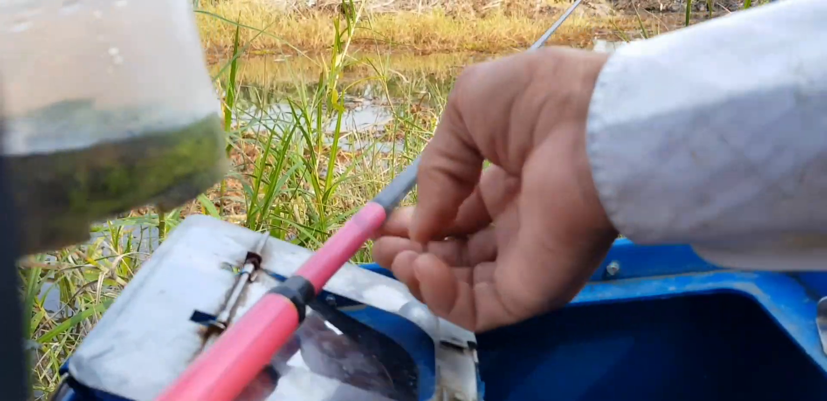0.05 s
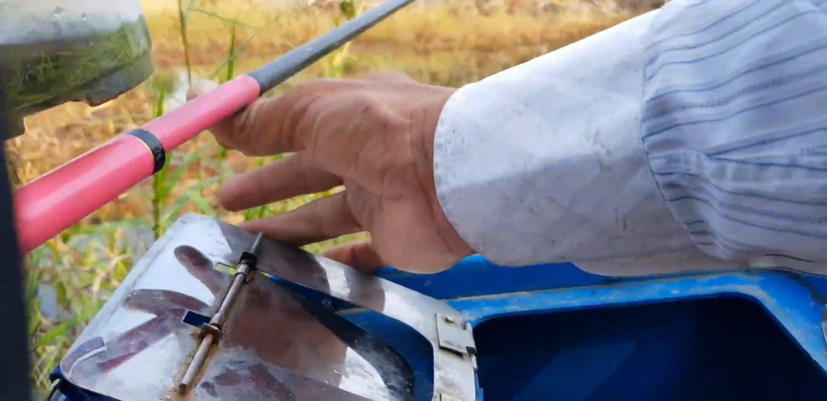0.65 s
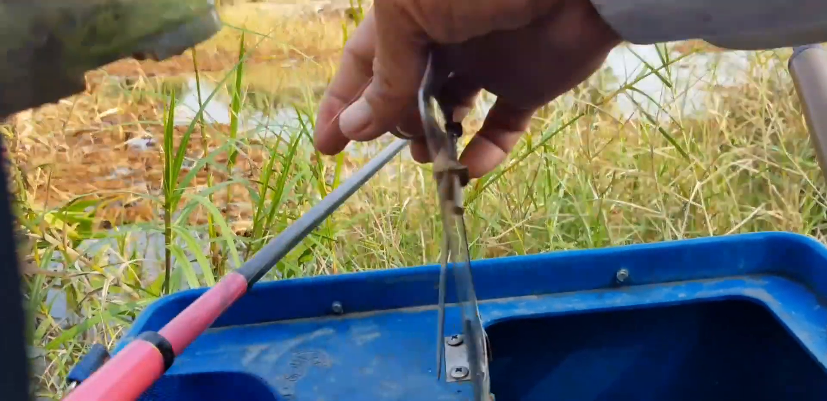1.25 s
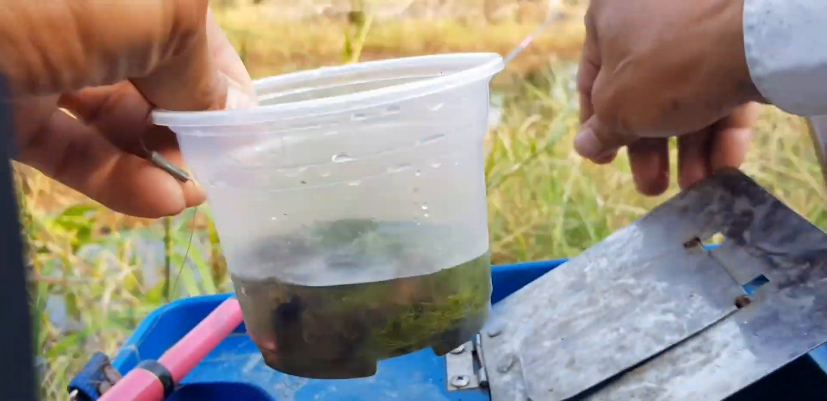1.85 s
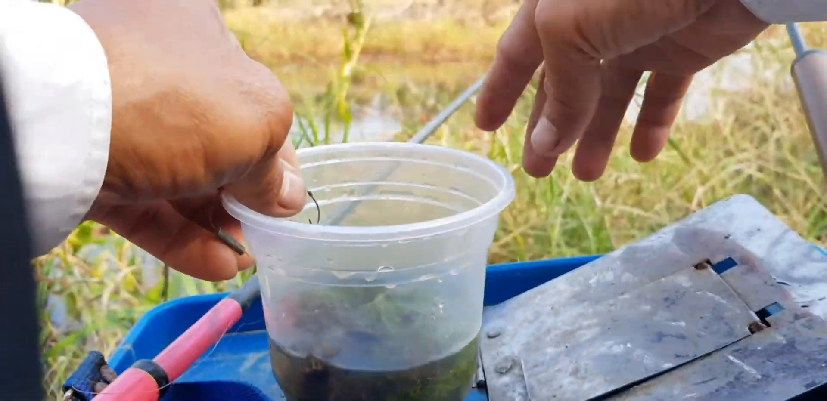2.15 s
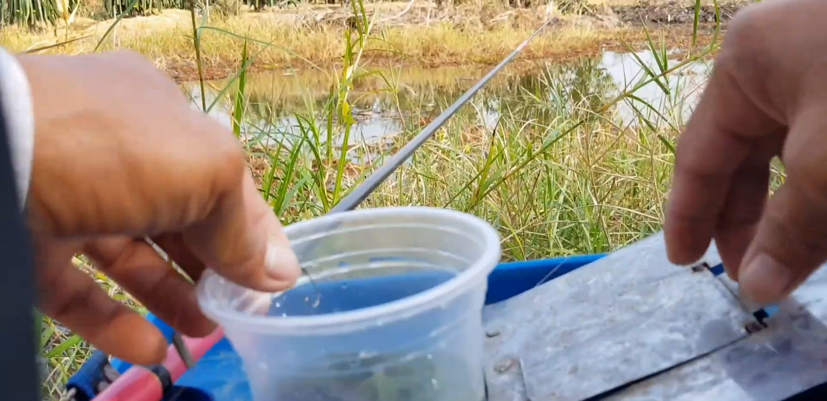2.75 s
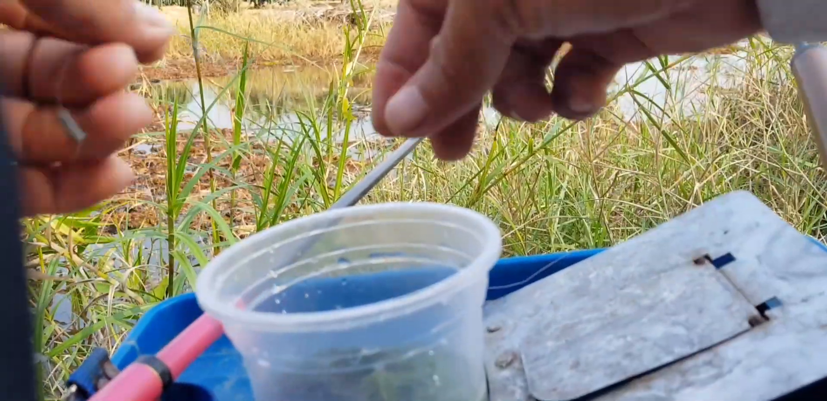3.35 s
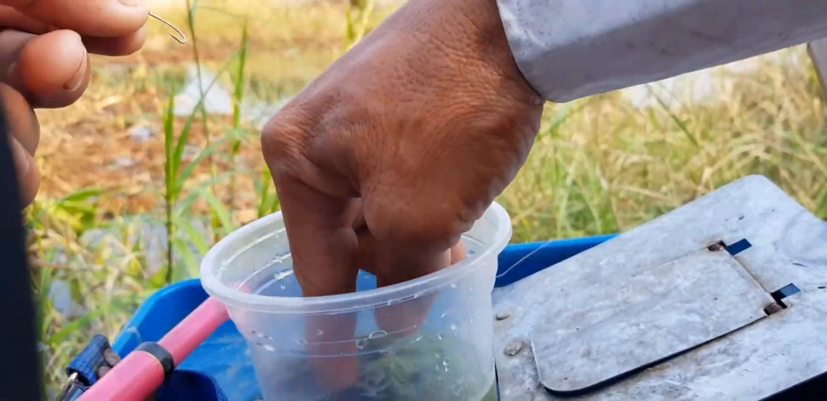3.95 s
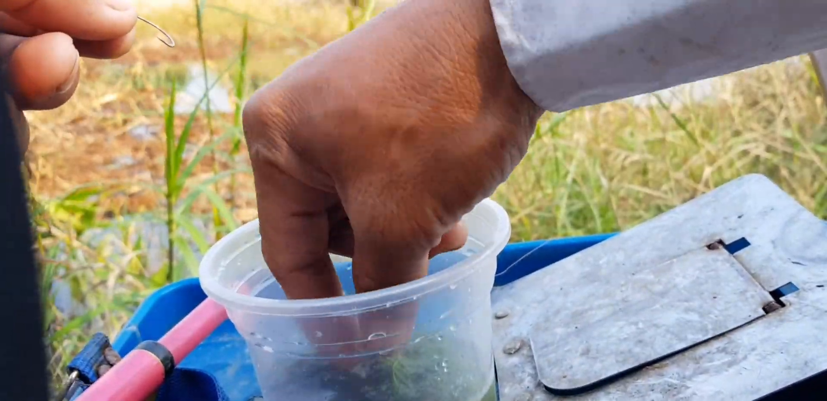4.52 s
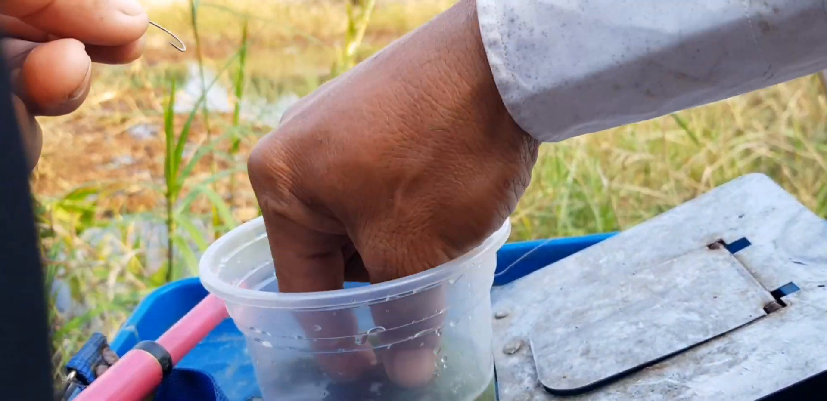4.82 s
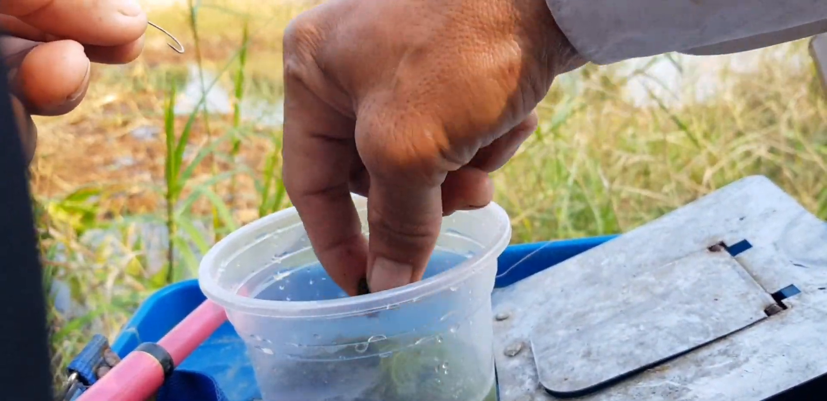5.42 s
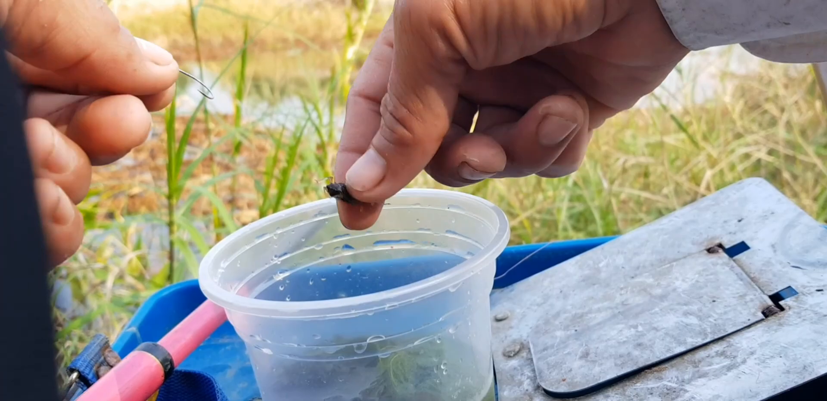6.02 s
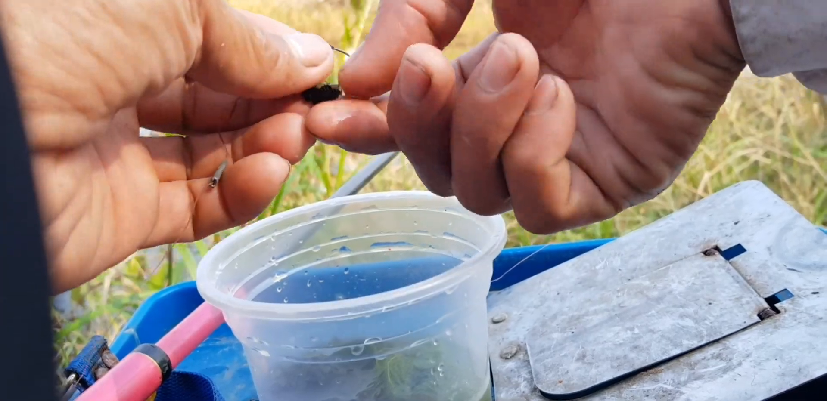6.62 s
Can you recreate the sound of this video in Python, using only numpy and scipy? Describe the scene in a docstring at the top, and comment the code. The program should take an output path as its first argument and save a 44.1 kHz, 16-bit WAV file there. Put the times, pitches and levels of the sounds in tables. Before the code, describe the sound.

A low distant rumble and faint hiss run throughout, outdoors. From the start, close and slightly right, things scrape and knock on a hollow plastic tackle box, with a sharp tick at 0.6 seconds. At about 1.2 seconds a metal lid slams, the loudest event, bouncing and rattling on its hinge until 1.5 while the rumble sinks. More scrapes and hollow knocks follow around 2 seconds, and a plastic cup of water thuds down at 2.3. A sleeve brushes softly, and the cup's thin wall gives a quick cluster of dry clicks, sharpest just after 3 seconds. Around 4 seconds fingers dip in with tiny faint splashes, and the cup bumps the box softly until 5. The rumble swells back by about 4.3. Small birds chirp faintly on the left near 2.2 and 3.5, then again from 5.6 to 6.4 seconds.

```python
"""On a reedy bank, over a distant rumble and hiss, an angler rummages at a plastic tackle box: it scrapes,
knocks and ticks. The rumble sinks as the metal lid swings over, slams and bounces on its rattling hinge.
A few small birds start to whistle. A cup of water thuds down on the hollow box, and its thin wall clicks
as it is let go. A sleeve brushes past, and fingers dip in for bait with tiny splashes while the cup
bumps the box. The rumble swells back and the birds call again."""
import sys
import numpy as np
from scipy import signal
from scipy.fft import rfft, irfft, next_fast_len
from scipy.io import wavfile

SR = 44100
rng = np.random.default_rng(int(sys.argv[2]) if len(sys.argv) > 2 else 0)


def generate_wav(sig):
    """Save sig (samples, or channels by samples) to the path in sys.argv[1] as 16-bit PCM at SR."""
    pcm = np.round(np.clip(np.atleast_2d(sig).T, -1, 1) * 32767).astype(np.int16)
    wavfile.write(sys.argv[1], SR, pcm)


N = 294411
TIME = np.arange(N) / SR
RING_TIME = np.arange(SR // 3) / SR   # seconds after a hit


def from_db(db):
    return 10 ** (np.asarray(db) / 20)

def unit_level(x):
    """Scale a sound to an average (rms) level of 1."""
    return x / np.sqrt(np.mean(x ** 2) + 1e-20)

def unit_onset(x):
    """Scale a hit so that its first 20 ms have an average level of 1."""
    return x / np.sqrt(np.mean(x[..., :SR // 50] ** 2) + 1e-20)

def at_hz(curve, hz):
    """Read a curve's value at any pitch."""
    pitches, values = np.transpose(curve)
    return np.interp(np.log(hz + 1e-3), np.log(pitches), values)

def panned(db):
    """Two gains that make the left side db louder than the right."""
    return from_db(np.array([[.5], [-.5]]) * db)

def add(out, start_s, sound):
    """Mix a sound in at its start time."""
    i = max(round(start_s * SR), 0)
    out[:, i:i + sound.shape[-1]] += sound[..., :N - i]

def gate(start_s, length_s, rise_s=.01, fall_s=.075):
    """Fade in, hold, and fade out by the end of the length."""
    return np.clip(np.minimum((TIME - start_s) / rise_s, (start_s + length_s - TIME) / fall_s), 0, 1)

def swells(peaks, rise_db_per_s, fall_db_per_s):
    """A level that grows to each peak and dies away."""
    return sum(from_db(db - np.maximum(rise_db_per_s * (s - TIME), fall_db_per_s * (TIME - s)))
               for s, db in peaks)

def dying(ring_s):
    """A fade that loses 60 dB in ring_s seconds."""
    return from_db(-60 * RING_TIME / ring_s)

def drift(per_s):
    """A random wobble that takes per_s turns a second."""
    turns = rng.standard_normal(int(N / SR * per_s) + 2)
    return unit_level(np.interp(TIME * per_s, np.arange(len(turns)), turns))

def grains(per_s, spread_db):
    """Tiny kicks of uneven size at random times."""
    sizes = from_db(spread_db * np.minimum(rng.exponential(1, N), 4)) * rng.choice([-1, 1], N)
    return sizes * (rng.random(N) < per_s / SR)

def through(kicks, ring):
    """Every kick sets off the same ring."""
    return unit_level(signal.fftconvolve(kicks[None], ring, axes=1)[:, :N])

def noise(spectrum, likeness, size, pan=((1, 0), (2, 0)), left_lead_s=0):
    """Shaped stereo noise; likeness is 1 where both ears hear the same, 0 where they are unrelated."""
    hz = np.arange(size // 2 + 1) * SR / size
    mid, side = rfft(rng.standard_normal((2, size)))
    alike = np.clip(at_hz(likeness, hz), -1, 1)
    both = np.sqrt(1 + alike) * mid + np.sqrt(1 - alike) * side * [[1], [-1]]
    both[1] *= np.exp(-2j * np.pi * hz * left_lead_s)
    return unit_level(irfft(both * from_db(at_hz(spectrum, hz)) * panned(at_hz(pan, hz)), size))

def steady(spectrum, likeness, **placing):
    """Noise that lasts the whole scene."""
    return noise(spectrum, likeness, next_fast_len(N, True), **placing)[:, :N]

# tone of the far rumble and the far hiss: pitch_hz, level_db
RUMBLE_TONE = [(13, -41), (22, -24.5), (43, -4), (92, 0), (112, -3), (135, -2.5), (174, -11.5),
               (229, -13.5), (299, -12), (389, -21.5), (441, -24.5), (491, -29.5), (771, -44), (900, -46.5),
               (1170, -74), (1980, -120)]
HISS_TONE = [(300, -19.5), (550, 5.5), (780, -10.5), (980, 0.5), (1150, -5.5), (1600, 2.5), (2300, -6),
             (2900, -10.5), (3400, -8), (4300, -15.5), (6700, -20.5), (7900, -38.5), (12500, -19.5),
             (16000, -31.5)]
# how alike each is in the two ears: pitch_hz, likeness
RUMBLE_LIKENESS = [(30, 0.9), (130, 0.99), (300, 0.95), (640, 0.96), (1000, .1)]
HISS_LIKENESS = [(700, 0.06), (1600, .55), (3500, 0.73), (9000, .1)]
# how far left the hiss sits: pitch_hz, left_over_right_db
HISS_PAN = [(600, 4.5), (1700, 5.5), (3400, 12.5), (6500, 8), (12000, 2)]
# loudness of the hiss: time_s, level_db
HISS_LEVELS = [(2.0, -63.5), (3.1, -67), (3.5, -71), (4.0, -64), (4.55, -65), (5.15, -61.5), (6.68, -60.5)]
def outdoors():
    """A lumpy far rumble with one long lull, under a smooth hiss from the left."""
    lull_db = -9 * gate(start_s=.91, length_s=3.37, rise_s=.7, fall_s=.89)
    rumble = from_db(-41 + lull_db + 1.2 * drift(20)) * steady(RUMBLE_TONE, RUMBLE_LIKENESS)
    rumble = signal.sosfilt(signal.butter(3, 33, "high", fs=SR, output="sos"), rumble)
    hiss_db = np.interp(TIME, *np.transpose(HISS_LEVELS))
    hiss = steady(HISS_TONE, HISS_LIKENESS, pan=HISS_PAN, left_lead_s=.00043)
    return rumble + from_db(hiss_db) * hiss

# where nearby sounds sit: pitch_hz, left_over_right_db
NEAR_PAN = [(170, -2), (300, 0.5), (450, -0.5), (700, -9), (1200, -2), (2200, -8), (3000, 4.5), (4700, -1),
            (8000, 4), (15000, 3)]
def struck(notes, damping=1, swell_cycles=.56):
    """A struck thing rings at its own notes, low ones building up last; more damping cuts them short."""
    out = 0
    for k, (hz, db, ring_s) in enumerate(notes):
        strength = (-1) ** k * from_db(db + 2 * rng.standard_normal())   # no two hits are the same
        swell = 1 - np.exp(-(RING_TIME * hz / swell_cycles) ** 2)
        note = swell * dying(ring_s / damping) * np.sin(2 * np.pi * hz * RING_TIME)
        out = out + strength * panned(at_hz(NEAR_PAN, hz)) * note
    return unit_onset(out)

# how alike nearby sounds are in the two ears: pitch_hz, likeness
NEAR_LIKENESS = [(300, 0.68), (700, 0.37), (1300, 0.88), (2300, 0.1), (16000, 0.066)]
def burst(spectrum, ring_s, tail_db, tail_s):
    """Countless close notes blur into noise that dies fast and leaves a weak, longer tail."""
    fade = dying(ring_s) + from_db(tail_db) * dying(tail_s)
    return unit_onset(noise(spectrum, NEAR_LIKENESS, len(RING_TIME), NEAR_PAN) * fade)

def favouring(notes, near_hz, boost_db):
    """The spot that is struck brings out the notes near one pitch."""
    return [(hz, db + boost_db * np.exp(-(np.log2(hz / near_hz) / .33) ** 2), ring_s)
            for hz, db, ring_s in notes]

# the notes of the plastic box: pitch_hz, level_db, ring_s
BOX_NOTES = [(102, -14, 0.22), (149.2, -17, 0.28), (167, -9.5, 0.18), (227, -9.5, 0.18), (259, -10.5, 0.18),
             (282.5, -0.5, 0.086), (305, 1, 0.041), (357.5, -13, 0.13), (413, -19, .08)]
def box_thump(damping, near_hz, boost_db):
    """The hollow box takes a few vibrations to get moving."""
    return struck(favouring(BOX_NOTES, near_hz, boost_db), damping, swell_cycles=.82)

# the clear notes of the metal lid: pitch_hz, level_db, ring_s
LID_NOTES = [(600, -14.5, 0.1), (660, -18, 0.21), (893, -13, 0.053), (1072.6, -1.5, 0.09),
             (1196, 0.5, 0.071), (1469, 1.5, .08), (1578, -4.5, 0.11), (1845, -5, 0.054), (1925, -3, .08),
             (2193, -2.5, 0.052), (2330, -7.5, .07), (2526, -10.5, 0.11), (2920, -15, 0.064),
             (3037, -15, 0.085), (3109, -15.5, 0.055), (4750, -18.5, .06), (4863, -19, 0.12)]
# tone of the lid's many blurred notes: pitch_hz, level_db
CLANG_TONE = [(300, -19), (450, -1), (800, -4.5), (1150, 1), (1340, -3.5), (1750, -2.5), (2200, -5),
              (2800, -11.5), (3500, -20.5), (5000, -39.5)]
def lid_clang(damping, near_hz):
    """The lid's clear notes ring over a short burst of blurred ones."""
    clear = struck(favouring(LID_NOTES, near_hz, boost_db=2.5), damping)
    return unit_onset(clear + burst(CLANG_TONE, ring_s=.036, tail_db=-24, tail_s=.2))

# tone of hard surfaces meeting: pitch_hz, level_db
CRACK_TONE = [(1500, -18.5), (3200, -2), (4800, 2.5), (6900, -2), (7700, -11.5), (8600, -14.5), (10300, 0),
              (13000, -1), (16000, -13.5)]
def contact(clang_db, thump_db, crack_db, clang_hz, thump_hz, damping):
    """Each hit cracks, thumps the box and rings the lid."""
    crack = from_db(crack_db) * burst(CRACK_TONE, ring_s=.029, tail_db=-24.5, tail_s=.36)
    thump = from_db(thump_db) * box_thump(damping, thump_hz, boost_db=7)
    clang = from_db(clang_db) * lid_clang(damping, clang_hz)
    return (crack + thump + clang) * (1 - dying(.0059))   # the surface gives a little before it bites

def sliding(clang_gain, hiss_gain):
    """Tiny slips ring the hand-muffled lid over a gritty hiss; its free edge sings faintly."""
    catching = from_db(2 * drift(35) + 2 * drift(400))
    slips = grains(per_s=1800, spread_db=6) * catching
    muffled = through(slips, struck(LID_NOTES, damping=14))
    edge = through(slips, struck(favouring(LID_NOTES, near_hz=3100, boost_db=14), damping=1.1))
    grit = unit_level(catching * steady(CLANG_TONE, NEAR_LIKENESS, pan=NEAR_PAN))
    hiss = unit_level(catching * steady(CRACK_TONE, NEAR_LIKENESS, pan=NEAR_PAN))
    clang = unit_level(muffled + from_db(6.5) * grit)
    return clang_gain * clang + hiss_gain * (hiss + from_db(-4.5) * edge)

# rod, lid and cup slide over the box: start_s, length_s, clang_db, hiss_db, drum_db
SCRAPES = [(0.0, 1.25, -56, -62, -71), (0.35, 0.033, -64, -83, -51), (0.019, 0.12, -45, -59, -38),
           (0.123, 0.17, -51, -61, -45), (0.657, 0.08, -54, -59.5, -60), (1.015, 0.15, -54, -57, -53),
           (1.33, 0.24, -43, -76, -38.5), (1.571, 0.12, -44.5, -58, -39), (1.686, 0.27, -53.5, -72, -45.5),
           (1.966, 0.14, -42, -53, -44.5), (2.266, 0.1, -44.5, -65.5, -38),
           (2.375, 0.28, -59.5, -71, -44.5), (2.659, 0.13, -60.5, -83, -47)]
def scrapes():
    """Each scrape bites quickly, eases off and stops; its slips ring the lid and drum on the box."""
    clang_gain, hiss_gain = 0, 0
    drum_gain = from_db(-60) * gate(0, length_s=3.25)   # hands drum faintly until the cup is let go
    for start_s, length_s, clang_db, hiss_db, drum_db in SCRAPES:
        easing_db = -2.5 * np.clip((TIME - start_s) / length_s, 0, 1)
        stroke = gate(start_s, length_s) * from_db(easing_db)
        clang_gain = clang_gain + from_db(clang_db) * stroke
        hiss_gain = hiss_gain + from_db(hiss_db) * stroke
        drum_gain = np.maximum(drum_gain, from_db(drum_db) * stroke)
    drumming = through(grains(per_s=3200, spread_db=4.5), struck(BOX_NOTES, damping=1.3))
    hand_pressure = from_db(drift(22))
    return drum_gain * drumming + hand_pressure * sliding(clang_gain, hiss_gain)

# hand, rod and cup knock against the box: start_s, clang_db, thump_db, crack_db, thump_hz
KNOCKS = [(0.036, -41, -41.5, -63, 244), (0.061, -40.5, -43, -45, 257), (0.081, -34, -34.5, -42.5, 320),
          (0.131, -43, -35, -61, 250), (0.188, -48, -34, -56, 159), (0.256, -46, -53, -55, 166),
          (0.463, -47, -43, -69, 159), (0.545, -49, -62, -63, 132), (0.786, -43, -51.5, -59.5, 169),
          (0.943, -41.5, -43.5, -50.5, 159), (1.971, -32, -26.5, -43, 328), (2.041, -46, -33.5, -63, 237),
          (2.086, -45, -33, -54, 240), (2.268, -43, -30.5, -62, 186), (2.281, -44.5, -34, -55, 323),
          (2.319, -43.5, -41, -51, 148), (2.396, -53.5, -41, -68, 155), (2.482, -53, -51, -65, 283),
          (2.523, -51, -42.5, -70, 214), (2.593, -58, -59, -80, 150), (2.797, -52, -55, -66, 315),
          (3.096, -50.5, -36, -75, 241)]
def knocks():
    """Light knocks land on different spots of the box."""
    out = np.zeros((2, N))
    for start_s, clang_db, thump_db, crack_db, thump_hz in KNOCKS:
        knock = contact(clang_db, thump_db, crack_db, clang_hz=1111, thump_hz=thump_hz, damping=1)
        add(out, start_s, knock)
    return out

# sharp ticks of small tackle: start_s, peak_db
TICKS = [(0.568, -21), (2.719, -50), (4.778, -33.5)]
def tackle_ticks():
    """Hard little snaps, over in a millisecond or two."""
    out = np.zeros((2, N))
    for start_s, peak_db in TICKS:
        snap = burst([(800, -20), (2500, -3), (6500, 0), (16000, -5)], ring_s=.002, tail_db=-38, tail_s=.12)
        add(out, start_s, from_db(peak_db) * snap / np.abs(snap).max())
    return out

# the loose hinge rattles: start_s, clang_db, crack_db
HINGE_RATTLES = [(1.124, -35.5, -35.5), (1.245, -28, -41), (1.274, -32.5, -39), (1.305, -33.5, -41.5),
                 (1.342, -31, -37), (1.364, -31.5, -37)]
# the lid lands and bounces: start_s, clang_db, crack_db, clang_hz
LID_BLOWS = [(1.154, -11.5, -29, 1190), (1.160, -20, -31, 1080), (1.172, -22, -41, 1100),
             (1.193, -27.5, -44, 1580), (1.207, -15.5, -26, 1010), (1.314, -13, -34, 1490),
             (1.395, -25, -45, 1170), (1.44, -29, -56, 1420), (1.499, -28.5, -48.5, 1290),
             (1.543, -30.5, -50.5, 1550)]
def lid_slam():
    """The lid slams and bounces on its rattling hinge; harder blows shake the box more."""
    out = np.zeros((2, N))
    for start_s, db, crack_db in HINGE_RATTLES:
        add(out, start_s, contact(db, db - 11.5, crack_db, clang_hz=1533, thump_hz=184, damping=.93))
    for start_s, db, crack_db, clang_hz in LID_BLOWS:
        add(out, start_s, contact(db, db - 3, crack_db, clang_hz, thump_hz=289, damping=.92))
    return out

# small birds chirp: start_s, length_s, from_hz, toward_hz, level_db
CHIRPS = [(2.239, 0.035, 4800, 2800, -62.5), (3.315, 0.048, 3920, 2760, -68),
          (3.467, 0.033, 3854, 2950, -65), (3.588, .03, 3700, 2920, -68), (5.128, 0.096, 9500, 8200, -79),
          (5.619, 0.093, 7380, 2065, -56), (6.185, 0.05, 3040, 3600, -55.5),
          (6.273, 0.15, 2300, 1303, -61.5)]
def birds():
    """Thin whistles off to the left glide fast, then settle; reeds and bank scatter them."""
    song = np.zeros((1, N))
    for start_s, length_s, from_hz, toward_hz, db in CHIRPS:
        t = np.arange(int(length_s * SR)) / SR
        hz = toward_hz + (from_hz - toward_hz) * np.exp(-2.8 * t / length_s)
        hz *= 1 + .047 * drift(458)[:len(t)]   # a quick quiver in pitch
        soft_ends = np.minimum(np.minimum(t, length_s - t) / .0045, 1)
        level = from_db(db - 6 * t / length_s) * soft_ends
        add(song, start_s, level * np.sin(2 * np.pi * np.cumsum(hz) / SR))
    scatter = rng.standard_normal((2, len(RING_TIME))) * dying(.33)
    echo = signal.fftconvolve(song, scatter / np.linalg.norm(scatter[0]), axes=1)[:, :N]
    return panned(db=8) * (from_db(-2) * song + from_db(-1) * echo)

# the notes of the cup's water-laden base and of its wall: pitch_hz, level_db, ring_s
CUP_BASE_NOTES = [(146, 4.5, 0.12), (222, -6, 0.075)]
CUP_WALL_NOTES = [(674, -9.5, 0.0095), (1000, -16, 0.04), (1570, 7.5, 0.01), (1963, 9.5, 0.012),
                  (2280, -15, 0.052), (2767, -8, 0.019), (3900, -34, 0.02), (4470, -7.5, 0.014)]
# the cup's wall clicks: start_s, peak_db, snap_db
CUP_CLICKS = [(2.6735, -37, -71), (2.718, -38, -59.5), (3.022, -33, -65.5), (3.0264, -26, -70),
              (3.057, -21.5, -61), (3.062, -22, -71), (3.075, -8.5, -54.5), (4.0932, -48, -84),
              (6.1342, -40, -70.5)]
# the cup bumps the box: start_s, level_db, thump_hz
CUP_PUSHES = [(3.060, -38, 208), (3.825, -36, 257), (3.882, -39.5, 147), (4.074, -34, 255),
              (4.089, -36, 238), (4.665, -38.5, 271), (5.037, -41.5, 127.3)]
def cup():
    """The full cup lands with a thud, its thin wall buckles with dry clicks, and pushes thump the box."""
    out = np.zeros((2, N))
    landing = from_db(-27) * struck(CUP_BASE_NOTES, swell_cycles=2.6)
    add(out, start_s=2.304, sound=landing)
    snap_tone = [(1000, -10), (3000, 0), (6500, -2), (8200, -20), (11500, -10), (16000, -22)]
    for start_s, peak_db, snap_db in CUP_CLICKS:
        wall = struck(CUP_WALL_NOTES)
        snap = burst(snap_tone, ring_s=.012, tail_db=-22, tail_s=.08)
        add(out, start_s, from_db(peak_db) * wall / np.abs(wall).max() + from_db(snap_db) * snap)
    for start_s, db, thump_hz in CUP_PUSHES:
        add(out, start_s, from_db(db) * box_thump(damping=2.22, near_hz=thump_hz, boost_db=10.5))
    return out

# sleeve and skin brush past the cup: peak_s, level_db
BRUSHES = [(2.94, -57.5), (4.085, -56.5)]
def brushing():
    """Cloth and skin slide softly, too lightly to ring the box."""
    tone = [(400, -21), (1200, 0), (2300, 6), (3300, -4), (5000, -2), (6800, -18), (8200, -34),
            (11000, -21.5), (16000, -32.5)]
    swish = steady(tone, NEAR_LIKENESS) * from_db(2.4 * drift(150))
    return swells(BRUSHES, rise_db_per_s=350, fall_db_per_s=329.5) * swish

# fingers dip into the water: peak_s, level_db
DIPS = [(3.86, -63), (4.1, -53.5)]
def water():
    """A brief fizz of tiny splashes as the fingers go in."""
    tone = [(300, -8), (600, 7), (1200, 0), (2300, 2.5), (4000, -9), (8000, -21), (10000, -19),
            (16000, -30)]
    splash = burst(tone, ring_s=.01, tail_db=-33, tail_s=.037)
    fizz = through(grains(per_s=700, spread_db=4), splash)
    return swells(DIPS, rise_db_per_s=260.5, fall_db_per_s=182) * fizz

def from_right(sound, lag_s, above_hz):
    """Lows reach both sides together through the box; highs come by air and reach the left late."""
    size = next_fast_len(N + SR // 10, True)
    hz = np.arange(size // 2 + 1) * SR / size
    delay_s = lag_s * hz ** 4 / (hz ** 4 + above_hz ** 4)
    left = irfft(rfft(sound[0], size) * np.exp(-2j * np.pi * hz * delay_s), size)[:N]
    return np.array([left, sound[1]])

def scene():
    """The box sits close by on the right, with the open bank all around."""
    box = from_right(scrapes() + knocks() + lid_slam() + cup(), lag_s=.00033, above_hz=1570)
    return outdoors() + box + tackle_ticks() + birds() + brushing() + water()

def record(dry):
    """Round off the loudest peaks and cut the very highest treble."""
    rounded = 1.2 * np.tanh(dry / 1.2)
    return signal.sosfiltfilt(signal.butter(18, 16200, fs=SR, output="sos"), rounded)


dry = scene()
out = record(dry)
generate_wav(out)
```